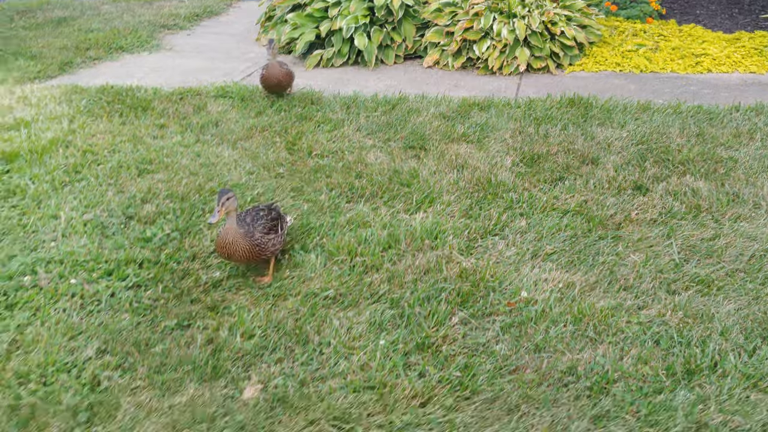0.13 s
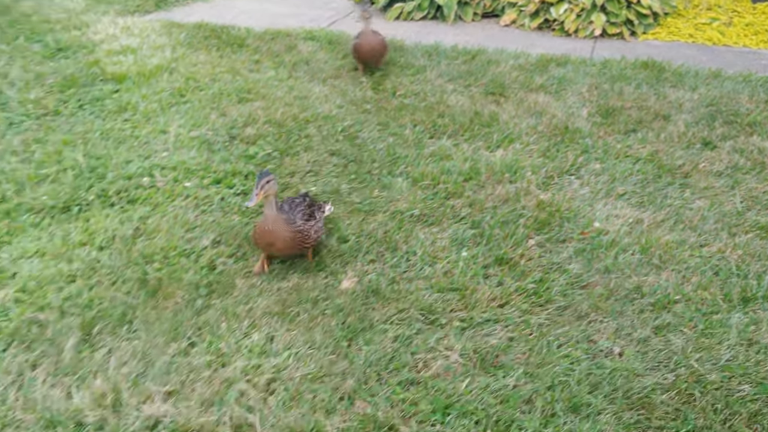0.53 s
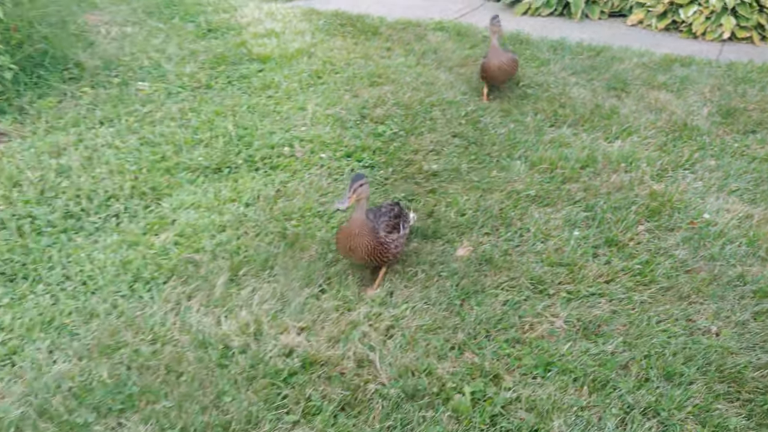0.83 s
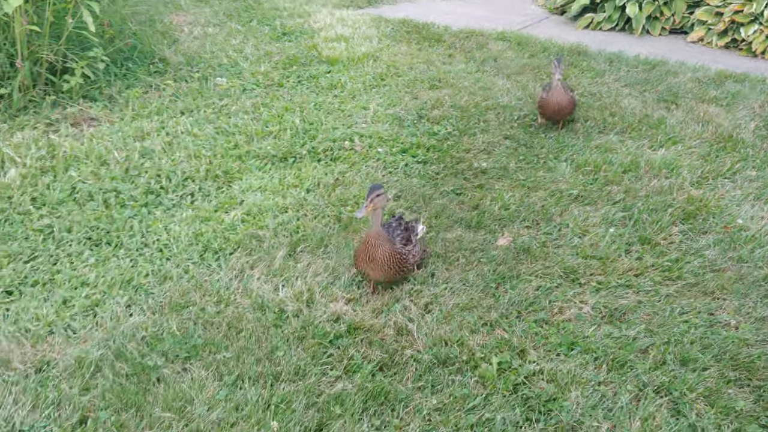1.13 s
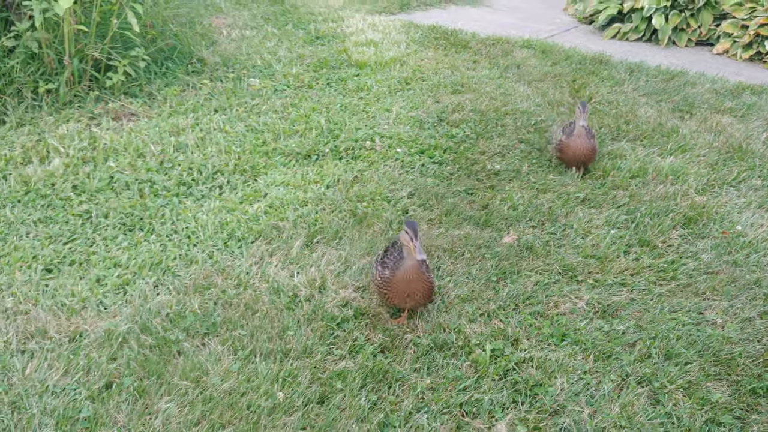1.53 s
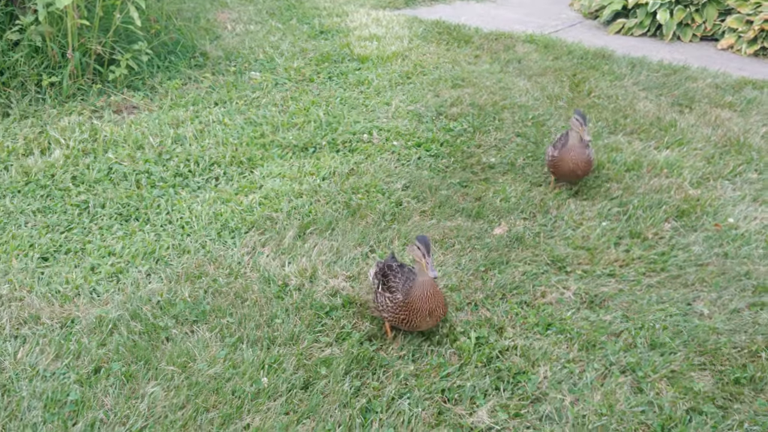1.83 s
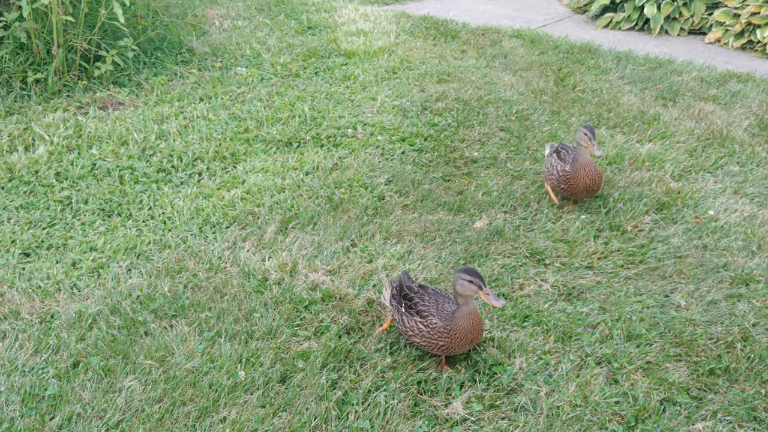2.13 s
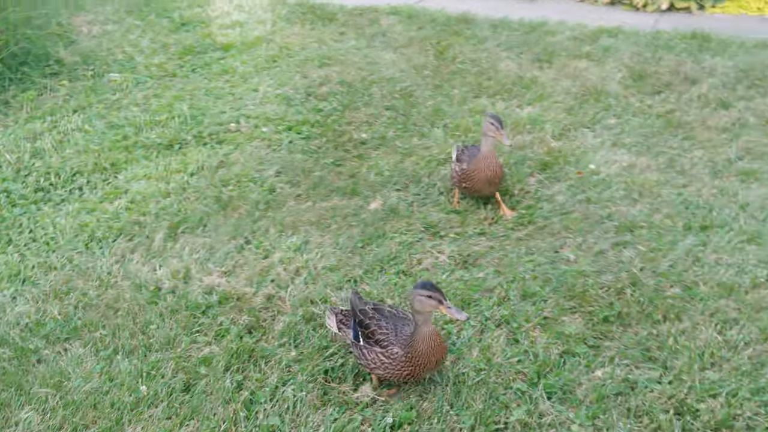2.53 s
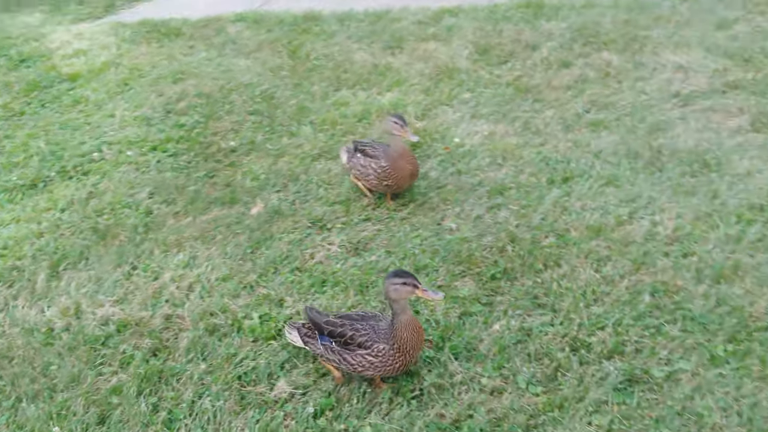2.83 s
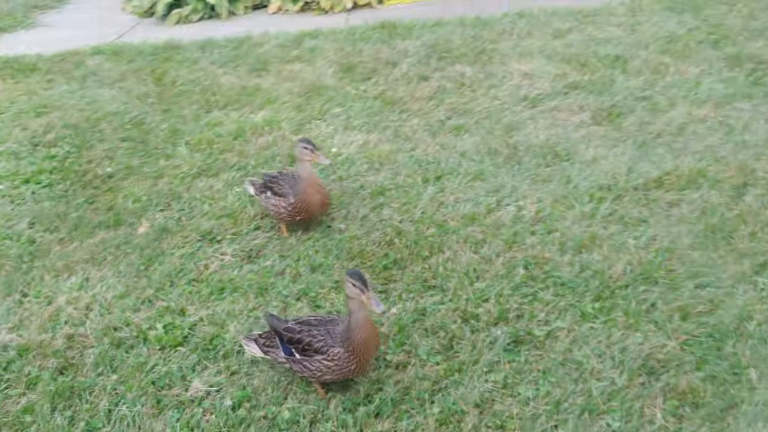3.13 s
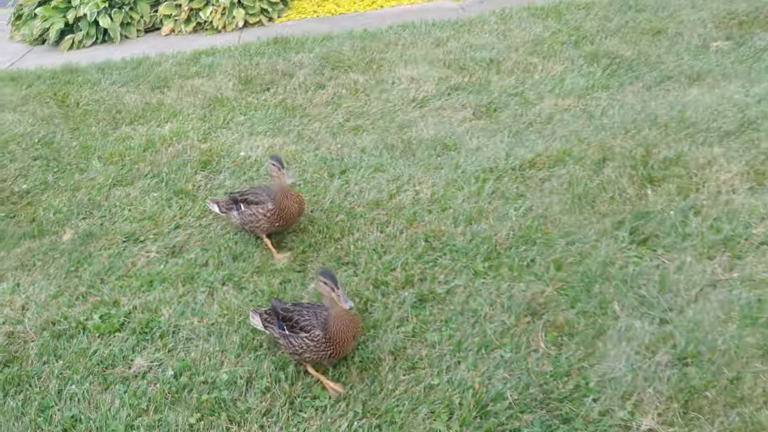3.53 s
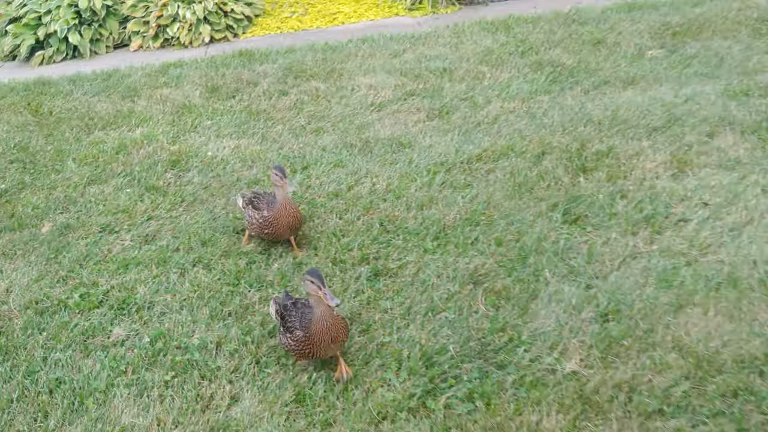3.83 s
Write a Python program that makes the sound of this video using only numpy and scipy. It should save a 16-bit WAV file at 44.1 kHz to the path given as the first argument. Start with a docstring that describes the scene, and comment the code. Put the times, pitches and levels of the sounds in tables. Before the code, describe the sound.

Soft low duck quacks, evenly spaced, on a lawn with constant airy hiss and wind bumps.

```python
"""A duck gives five soft quacks: sharp pulses ring a nasal resonance that widens as the bill opens.
Around it: small dull knocks and short echoes, fan and traffic hiss, motor drone, fan whines, insect trill,
lumpy wind with bumps on the left microphone, grass rustles nearer the right.
As the camera turns, the hiss changes colour and right-channel lag.
The recorder starts silent, then fades in, bass later. Two microphones, four seconds."""
import sys
import numpy as np
from scipy import signal
from scipy.fft import rfft, irfft
from scipy.io import wavfile
from scipy.ndimage import uniform_filter1d

SR = 44100
rng = np.random.default_rng(int(sys.argv[2]) if len(sys.argv) > 2 else 0)


def bounce(signal):
    """Save signal as a 16-bit WAV file at the path given by the first command-line argument."""
    frames = np.transpose(np.atleast_2d(signal))
    limited = np.clip(frames, -1, 1)
    pcm = np.round(limited * 32767).astype(np.int16)
    wavfile.write(sys.argv[1], SR, pcm)


def invert_db(x):
    """Field ratio 10**(x/20) for x, a level in decibels (scalar or array-like)."""
    u = np.asarray(x, float) / 20
    return 10 ** u


N = 176400


def evened(x):
    """Scales to rms 1."""
    return x / np.sqrt(np.mean(x ** 2, -1, keepdims=True) + 1e-20)


def read_column(points, hz, col=1):
    """Interpolates one table column on a log-frequency axis."""
    table = np.array(points, float)
    return np.interp(np.log(hz + 1), np.log(table[:, 0] + 1), table[:, col])


def curve(points, t):
    """Interpolates a (time, value) table linearly."""
    return np.interp(t, *np.transpose(points))


def left_right(left_db, right_db):
    """Column of two channel gains."""
    return invert_db(np.array([[left_db], [right_db]]))


def add(mix, start_s, sound):
    """Mixes a sound in at a time, cut at the end of the mix."""
    part = mix[..., round(start_s * SR):][..., :sound.shape[-1]]
    part += sound[..., :part.shape[-1]]


def resonate(x, hz, width_hz):
    """Resonance of gain 1: shift to 0 Hz, one-pole lowpass, shift back; hz may be a curve."""
    turn = np.exp(2j * np.pi * np.cumsum(hz * np.ones(len(x))) / SR)
    r = np.exp(-np.pi * width_hz / SR)
    return 2 * (turn * signal.lfilter([1 - r], [1, -r], x / turn)).real


def coloured(points, channels):
    """Noise shaped by a spectrum table, rms 1."""
    spectrum = rfft(rng.standard_normal((channels, N)))
    gain = invert_db(read_column(points, np.fft.rfftfreq(N, 1 / SR)))
    return evened(irfft(spectrum * gain, N))


def slow(seconds, channels):
    """Twice-smoothed noise, rms 1."""
    size = max(round(seconds * SR), 2)
    once = uniform_filter1d(rng.standard_normal((channels, N)), size)
    return evened(uniform_filter1d(once, size))


# hiss spectrum before and after the turn:
# hz, left_db, right_db, turned_left_db, turned_right_db
HISS_SPECTRUM = [(260.0, -73.5, -80.5, -73.5, -72.5), (380, -82, -83.5, -76.5, -77.5),
                 (863, -72, -73.5, -69, -71.5), (1353, -79, -81, -73, -72), (2010, -89.5, -67, -81, -67),
                 (2940, -82, -71.0, -79.5, -72.5), (3100, -85.5, -75.5, -84, -74.5),
                 (4440, -85, -83.5, -82, -79.5), (5460, -79, -69, -79, -83), (6070, -98, -73, -81.5, -89),
                 (7006, -89, -68.5, -94.5, -78.5), (8530, -104.0, -103.0, -106.0, -104.0),
                 (9560, -105.0, -108.0, -107.0, -108.0), (9400, -99.0, -100.0, -96.5, -100.0),
                 (10350, -105.0, -102.0, -104.0, -102.0), (12200, -100.0, -100.0, -99.0, -99.0),
                 (11400, -118.0, -105.0, -115.0, -105.0), (12500, -121.0, -105.0, -133.0, -106.0),
                 (13400, -125.0, -108.0, -127.0, -108.0), (15100, -126.0, -110.0, -128.0, -113.0),
                 (15400, -129.0, -113.0, -134.0, -118.0), (15590.0, -136.0, -120.0, -139.0, -139.0)]
# likeness of the microphones: hz, in_step_share, late_at_right_share
MICROPHONE_LIKENESS = [(300, .85, 0.), (600, .65, 0.), (1000, .1, .2), (1500, 0., .5), (2900, 0., .65),
                       (3900, 0., .4), (5000, 0., .75), (6500, 0., .65), (7500, 0., .3), (8500, 0., .1)]
# camera direction: time_s, turn_0_to_1, right_lag_ms
CAMERA_TURN = [(0, 0.86, 0.19), (1.5, 0.37, 0.47), (2.4, 0.52, 0.39), (2.9, 0.95, 0.34), (3.3, 0.83, 0.22),
               (4, 0.89, 0.19)]
# opening tint of the hiss, faded out by TINT_END_S: hz, tint_db
OPENING_TINT = [(900, -3), (1400, -5), (2000, 3.5), (2500, 0), (3050, 7.5), (3800, -6.5), (4800, -7),
                (5700, 1), (6300, 2), (7000, -3), (7800, 1.5)]
TINT_END_S, PATCHY_RMS_DB = 1.03, 0.75
TOP_HZ, TOP_DB = 12300, -6
SHAFT_HZ, SHAFT_THROB, BLADE_THROB, THROB_FROM_HZ = 26.84, 0.081, 0.055, 1400


def hiss():
    """Fan and far traffic noise, part of it late at the right; treble throbs with shaft and blades."""
    frames, hz = N // 256 + 5, np.fft.rfftfreq(1024, 1 / SR)[:, None]
    a, b, c, d, patches = rng.standard_normal((frames, 513, 5)).T
    patches = uniform_filter1d(uniform_filter1d(patches, size=12, axis=0), size=12, axis=1)
    time_s, turn, lag_ms = np.transpose(CAMERA_TURN)
    t = np.arange(frames) * 256 / SR
    turn = np.clip(np.interp(t, time_s, turn), 0, 1)
    lag_ms = np.interp(t, time_s, lag_ms)

    in_step = np.clip(read_column(MICROPHONE_LIKENESS, hz, col=1), 0, 1)
    late = np.clip(read_column(MICROPHONE_LIKENESS, hz, col=2), 0, 1)
    shared = in_step + late * np.exp(2j * np.pi * hz * lag_ms / 1000)
    right = a + 1j * b
    own = np.sqrt(np.maximum(1 - abs(shared) ** 2, 0)) * (c + 1j * d)
    spectrum = np.array([shared * right + own, right])

    level_db = np.array([(1 - turn) * read_column(HISS_SPECTRUM, hz, k)
                         + turn * read_column(HISS_SPECTRUM, hz, k + 2) for k in (1, 2)])
    level_db = level_db + read_column(OPENING_TINT, hz) * np.clip(1 - t / TINT_END_S, 0, 1)
    level_db = level_db + TOP_DB * (hz > TOP_HZ) + PATCHY_RMS_DB * patches / patches.std()
    low_cut = np.minimum(hz / HISS_SPECTRUM[0][0], 1) ** 4
    spectrum *= invert_db(level_db) * low_cut
    noise = signal.istft(spectrum, nperseg=1024, noverlap=768)[1][:, :N] * np.sqrt(SR / 1024 * 3 / 2)

    highpass = signal.butter(2, THROB_FROM_HZ, "high", fs=SR, output="sos")
    treble = signal.sosfilt(highpass, noise)
    shaft = 2 * np.pi * SHAFT_HZ * np.arange(N) / SR
    blades = 3 * shaft  # three blades
    return noise + treble * (SHAFT_THROB * np.cos(shaft) + BLADE_THROB * np.cos(blades))


# motor tones before DRONE_LEVEL: hz, fuzz_width_hz (first pass), level_db, steady_share
DRONE = [(53.5, 2.4, -44, 0.73), (80, 10.6, -48.5, 0.39), (100.36, 13, -35, 0.76),
         (132.8, 3.9, -44.5, 0.42), (160.5, 1.6, -50, 0.93), (199.4, 4.8, -50.5, 0.39)]
# drone gain: time_s, gain_db
DRONE_LEVEL = [(0, -1), (.6, -1.5), (1., -4.5), (1.3, 1), (2.4, 2.5), (2.7, -2.5), (3.2, 2.5), (4, -2)]
# relative rumble spectrum: hz, relative_db
RUMBLE_SPECTRUM = [(12, -64), (25, 13.5), (50, 12.5), (110, 8), (200, 9), (300, -13), (500, -95.5)]
RUMBLE_RMS_DB, RUMBLE_ALIKE = -45.5, 0.96


def motor():
    """Low tones, each a sine plus resonated noise, over a rumble nearly alike in both channels."""
    t, drone = np.arange(N) / SR, np.zeros(N)
    for hz, width_hz, level_db, steady in DRONE:
        once = resonate(rng.standard_normal(N), hz, width_hz)
        fuzz = evened(resonate(once, hz, 2 * width_hz))
        tone = np.sqrt(2) * np.sin(2 * np.pi * (hz * t + rng.random()))
        drone += invert_db(level_db) * evened(steady * tone + (1 - steady) * fuzz)
    drone = drone * invert_db(curve(DRONE_LEVEL, t))
    left, other = coloured(RUMBLE_SPECTRUM, channels=2)
    right = RUMBLE_ALIKE * left + np.sqrt(1 - RUMBLE_ALIKE ** 2) * other
    return drone + invert_db(RUMBLE_RMS_DB) * np.array([left, right])


# faint fan tones: hz, width_hz, left_db, right_db
WHINES = [(388, 12, -62, -62), (1895, 20, -68, -54), (2075, 30, -70, -55), (2365, 30, -70, -56),
          (2795, 40, -68, -59), (2910, 50, -65, -56)]


def whines():
    """Narrow fuzzy fan tones: noise through single resonances."""
    mix = np.zeros((2, N))
    for hz, width_hz, left_db, right_db in WHINES:
        tone = evened(resonate(rng.standard_normal(N), hz, width_hz))
        mix += tone * left_right(left_db, right_db)
    return mix


# trill level before stroke spread: time_s, first_stroke_db, second_stroke_db
TRILL = [(0, -66, -59), (.45, -62, -60), (.62, -56, -59), (.72, -60, -52), (.9, -58, -55), (1.1, -66, -64),
         (2.4, -70, -68), (2.9, -78, -77)]
# stroke pitch, first and second: [hz]
STROKE_HZ = [5670, 5360]
TRILL_PER_S, BEAT_AT_S, TRILL_LEFT_DB = 26.75, .7075, -1.5
STROKE_SIGMA_S, SAG_PER_SIGMA_HZ, STROKE_SPREAD_DB = .0027, 70, 1.6


def insect():
    """Trill: two falling chirps and a rest per beat, uneven in strength."""
    t, ring, table = np.arange(N) / SR, np.zeros(N), np.transpose(TRILL)
    for k, hz in enumerate(STROKE_HZ):
        beats = TRILL_PER_S * (t - BEAT_AT_S) - (k - 1) / 3
        nearest = np.round(beats)
        u = (beats - nearest) / TRILL_PER_S
        uneven, phase = rng.standard_normal((2, 256))[:, nearest.astype(int) % 256]
        cycles = hz * u - SAG_PER_SIGMA_HZ * u ** 2 / (2 * STROKE_SIGMA_S)
        chirp = np.cos(2 * np.pi * cycles + 10 * phase)
        strokes = evened(np.exp(-(u / STROKE_SIGMA_S) ** 2 / 2) * chirp)
        level_db = np.interp(t, table[0], table[k + 1]) + STROKE_SPREAD_DB * uneven
        ring += invert_db(level_db) * strokes
    lag = round(CAMERA_TURN[0][2] * SR / 1000)  # fixed at the first camera lag
    return np.array([invert_db(TRILL_LEFT_DB) * ring, np.roll(ring, lag)])


# relative wind spectrum: hz, relative_db
WIND_SPECTRUM = [(10, -44), (30, -5.5), (60, -2.5), (120, -7), (250, -24), (500, -99)]
# wind strength at the left microphone: time_s, level_db
GUST = [(0, -60), (.2, -32), (.3, -40.5), (.9, -33), (1.2, -37.5), (1.7, -39), (2.4, -40.5), (2.7, -40),
        (3.1, -44), (3.5, -40), (3.7, -31), (4, -36)]
# bumps at the left microphone: centre_s, peak_db, hz, half_length_s (to 1/e^2)
BUMPS = [(.31, -28, 45, 0.033), (0.657, -22.5, 65.4, 0.033), (0.921, -12, 111, 0.005),
         (0.942, -19, 59, 0.026), (0.9927, -8, 90, .014), (0.9944, -19.5, 227, 0.0033),
         (1.009, -16.5, 167, 0.004), (1.167, -16.5, 75, 0.0084), (1.6, -31, 80, 0.044),
         (2.358, -25, 60, .03), (3.464, -25, 51.5, 0.029), (3.636, -24, 90, 0.011),
         (3.69, -32, 43.7, 0.059), (3.757, -24, 54.4, 0.07), (3.9, -26.5, 72, 0.033)]
WIND_RIGHT_DB, BUMP_RIGHT_DB, LUMPY_RMS_DB = -8.5, -36, 4.5


def wind():
    """Lumpy low noise, unrelated between microphones, plus bumps as short sine swings."""
    t = np.arange(N) / SR
    lumps = invert_db(LUMPY_RMS_DB * slow(0.02, channels=2))
    mix = evened(coloured(WIND_SPECTRUM, channels=2) * lumps)
    mix = mix * invert_db(curve(GUST, t)) * left_right(0, WIND_RIGHT_DB)
    for centre_s, peak_db, hz, half_length_s in BUMPS:
        u = t - centre_s
        bump = np.exp(-2 * (u / half_length_s) ** 2) * np.sin(2 * np.pi * hz * u)
        mix += invert_db(peak_db) * bump * left_right(0, BUMP_RIGHT_DB)
    return mix


# rustles at the right microphone: centre_s, half_length_s (to 1/e^2), level_db
RUSTLES = [(.9, 0.055, -56), (1.51, 0.31, -49.5), (1.685, 0.11, -47), (2.995, 0.058, -45),
           (3.274, 0.19, -51), (3.463, 0.063, -48.5), (3.632, 0.062, -50), (3.89, 0.094, -47.5),
           (3.99, 0.07, -50.5)]
# relative grass spectrum: hz, relative_db
GRASS_SPECTRUM = [(4000, -36), (6000, -6), (7100, 6), (8700, -18), (10000, -17.5), (11800, -16.5),
                  (14000, -21.5), (15700, -26)]
GRASS_LEFT_DB, CRACKLE_RMS_DB = -26, 2.5


def grass():
    """Swishes: treble noise with fast random level, under bell-shaped envelopes."""
    t, shape = np.arange(N) / SR, np.zeros(N)
    for centre_s, half_length_s, level_db in RUSTLES:
        shape += invert_db(level_db) * np.exp(-2 * ((t - centre_s) / half_length_s) ** 2)
    crackle = invert_db(CRACKLE_RMS_DB * slow(0.0032, channels=1))
    noise = coloured(GRASS_SPECTRUM, channels=2) * crackle
    return shape * noise * left_right(GRASS_LEFT_DB, 0)


PITCH_RISE, JITTER, BREATHY = .045, .15, .35
SCOOP, SCOOP_S = .1, .005  # pitch drops in from above
RISE_S, FALL_S, OPENING_S = .006, .019, .004
SHUT_HZ, SHUT_WIDTH_HZ, SHUT_DB, OPEN_WIDTH_HZ = 990, 190, 1.5, 580
CHEST_HZ, CHEST_WIDTH_HZ, CHEST_DB = 320, 800, -5.5
RASP_HZ, RASP_WIDTH_HZ, RASP_DB = 3000, 1800, -13
NOSE_STAYS = .12  # share of the nasal ring left with the bill open


def quack(length_s, level_db, pitch_hz, open_hz, half_open_s, open_db):
    """Sharp pulses and breath ring a nasal resonance that rises and widens as the bill opens."""
    t = np.arange(0, length_s + FALL_S, 1 / SR)
    wobble, breath = rng.standard_normal((2, SR // 4))[:, :len(t)]
    opened = 1 / (1 + np.exp(-(t - half_open_s) / OPENING_S))
    bend = SCOOP * np.exp(-t / SCOOP_S) - PITCH_RISE * (1 - opened)
    hz = pitch_hz * (1 + bend + JITTER * uniform_filter1d(wobble, size=80))
    turns = np.cumsum(hz) / SR
    pulses = sum(np.cos(2 * np.pi * k * turns) for k in range(1, 24))
    drive = -evened(pulses) + BREATHY * breath * np.exp(np.cos(2 * np.pi * turns))

    def ring(f, width_hz):
        return evened(resonate(resonate(drive, f, width_hz), f, width_hz))

    bill_hz = SHUT_HZ + (open_hz - SHUT_HZ) * opened
    shut = invert_db(SHUT_DB) * ring(SHUT_HZ, SHUT_WIDTH_HZ)
    rasp = invert_db(RASP_DB) * ring(RASP_HZ, RASP_WIDTH_HZ)
    chest = invert_db(CHEST_DB) * ring(CHEST_HZ, CHEST_WIDTH_HZ)
    wide = ring(bill_hz, OPEN_WIDTH_HZ) + rasp - chest
    fall = np.clip((length_s + FALL_S - t) / (2 * FALL_S), 0, 1)
    shape = np.clip(t / RISE_S, 0, 1) * fall
    nasal = (1 - (1 - NOSE_STAYS) * opened) * shut
    return invert_db(level_db) * shape * (nasal - opened * invert_db(open_db) * wide)


YARD_DB, YARD_T60_S = -16, .2


def yard(x):
    """Sparse decaying echoes from house and shrubs, different in each microphone."""
    t = np.arange(SR // 4) / SR
    taps = rng.standard_normal((2, len(t))) * (rng.random((2, len(t))) < 1 / 20)
    taps = taps * invert_db(-60 * t / YARD_T60_S) * (t > .008)
    taps = taps / np.linalg.norm(taps[0])
    return invert_db(YARD_DB) * signal.fftconvolve(x[None], taps, axes=1)[:, :N]


# calls: start_s, length_s, level_db, pitch_hz, open_bill_hz, half_open_after_s, open_bill_db
QUACKS = [(2.424, .032, -34, 260, 1520, .012, 1.), (2.646, .042, -35, 254, 1430, .0115, 3.5),
          (2.877, .038, -35, 258, 1340, .014, 1.), (3.11, .038, -35.5, 257.3, 1420, .015, 1.),
          (3.348, .048, -34, 258, 1860, .023, -1.)]
# small dull knocks: start_s, level_db, hz, t60_s
KNOCKS = [(2.731, -31.5, 440, 0.03), (2.731, -30, 780, 0.022), (2.732, -32, 1350, .012),
          (2.755, -36, 453, .03)]


def duck():
    """Quacks and knocks (decaying sines), with the yard's echoes."""
    mix, t = np.zeros(N), np.arange(0, .1, 1 / SR)
    for start_s, *call in QUACKS:
        add(mix, start_s, quack(*call))
    for start_s, level_db, hz, t60_s in KNOCKS:
        add(mix, start_s, invert_db(level_db - 60 * t / t60_s) * np.sin(2 * np.pi * hz * t))
    return mix + yard(mix)


def scene():
    """Sums all sources."""
    return hiss() + motor() + whines() + insect() + wind() + grass() + duck()


def roll_off(x):
    """The treble ends steeply here."""
    return signal.sosfilt(signal.butter(12, 15620, fs=SR, output="sos"), x)


# recorder level: time_s, gain_db
FADE = [(.078, -32.5), (.11, -19), (.2, -12), (.3, -6.5), (.6, -3.5), (1., -2), (1.3, -0.3), (2., -0.3),
        (4., -0.16)]
START_S = .078
BASS_HZ, BASS_IN_S, BASS_START_DB = 90, .22, -29


def record(dry):
    """Silence, then a fade-in with the bass arriving later."""
    t = np.arange(N) / SR
    bass = signal.sosfiltfilt(signal.butter(2, BASS_HZ, fs=SR, output="sos"), dry)
    held_back = (1 - invert_db(BASS_START_DB)) / (1 + np.exp((t - BASS_IN_S) / 0.0071))
    mix = (dry - held_back * bass) * invert_db(curve(FADE, t)) * (t > START_S)
    return roll_off(mix)


dry = scene()
out = record(dry)
bounce(out)
```